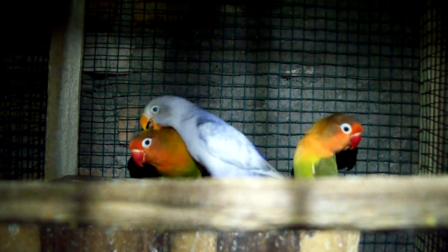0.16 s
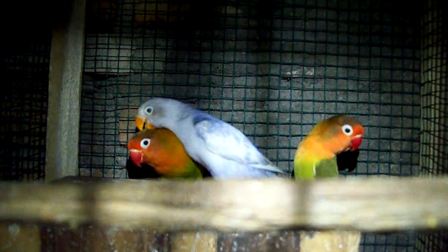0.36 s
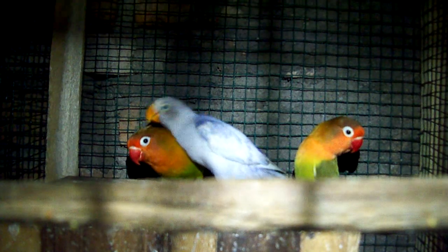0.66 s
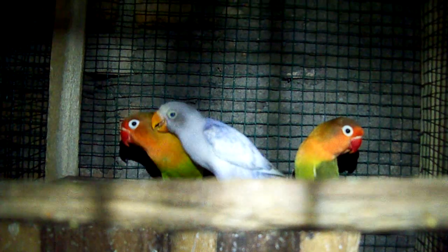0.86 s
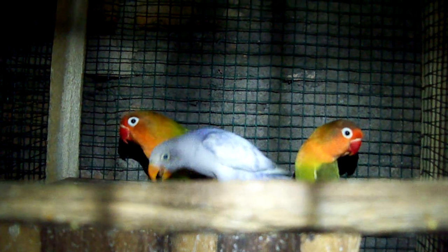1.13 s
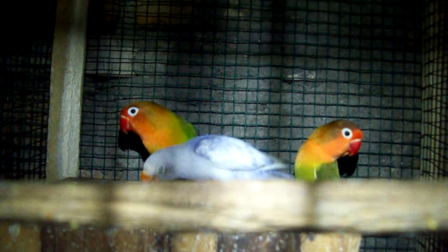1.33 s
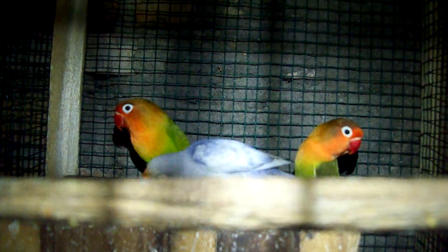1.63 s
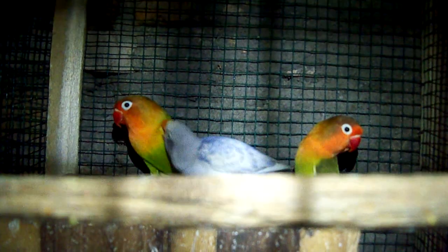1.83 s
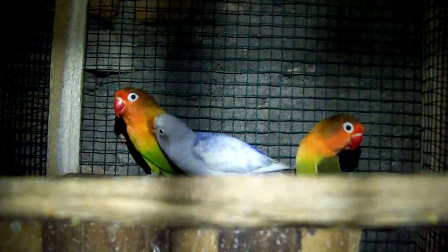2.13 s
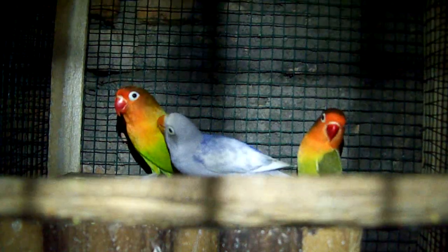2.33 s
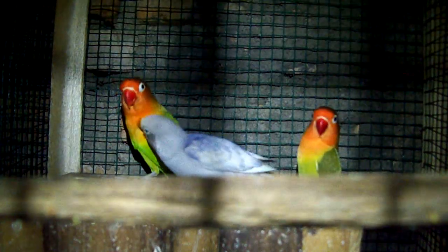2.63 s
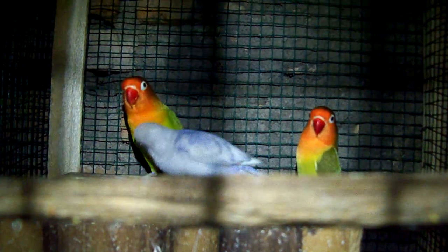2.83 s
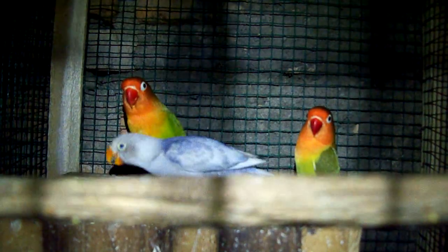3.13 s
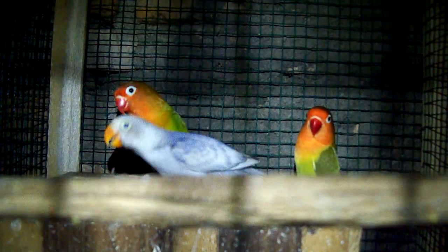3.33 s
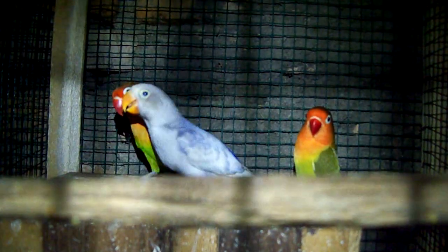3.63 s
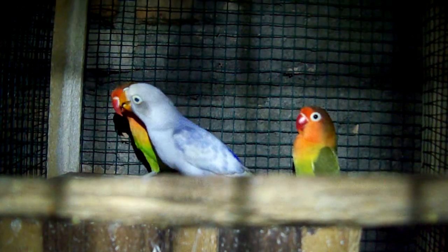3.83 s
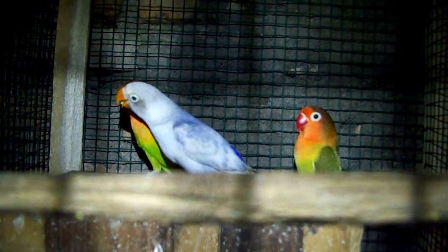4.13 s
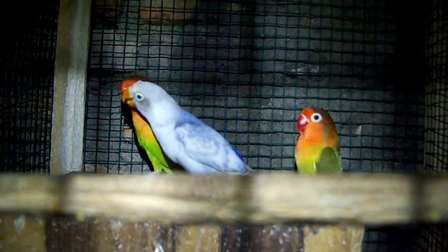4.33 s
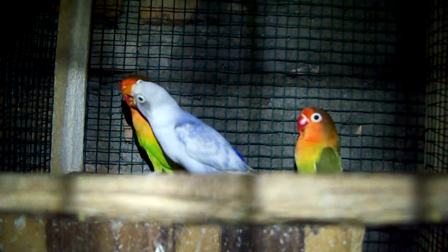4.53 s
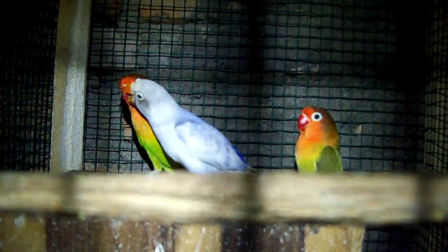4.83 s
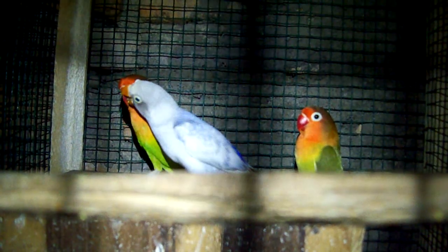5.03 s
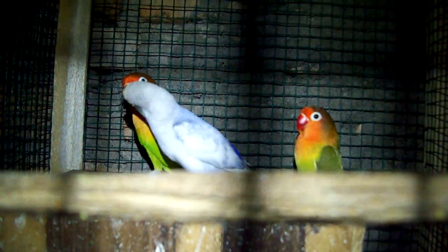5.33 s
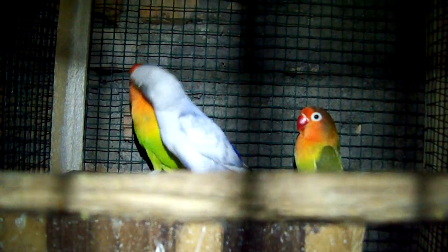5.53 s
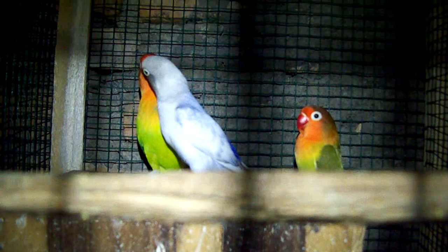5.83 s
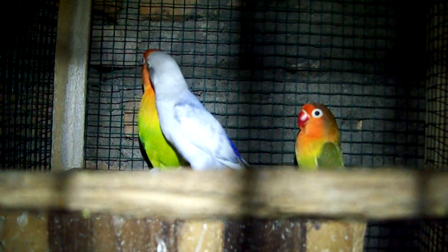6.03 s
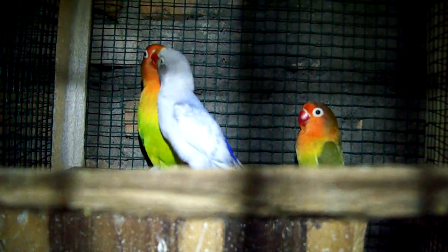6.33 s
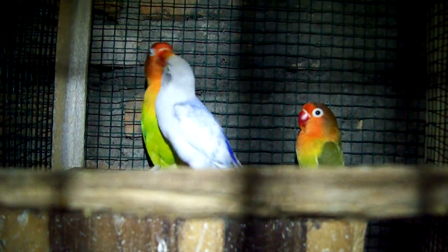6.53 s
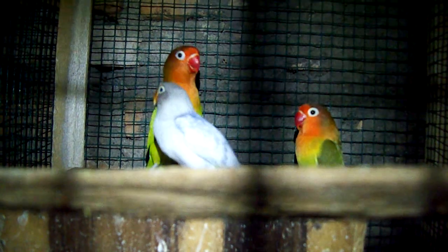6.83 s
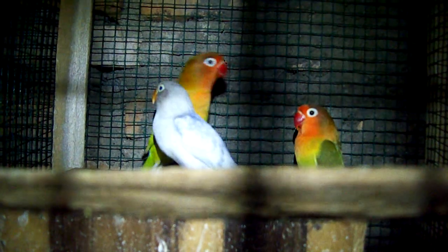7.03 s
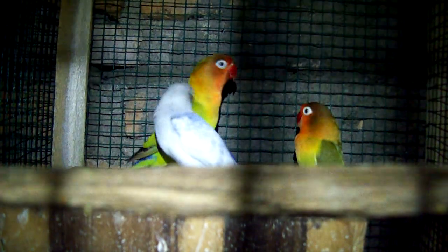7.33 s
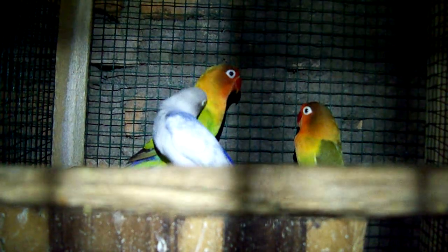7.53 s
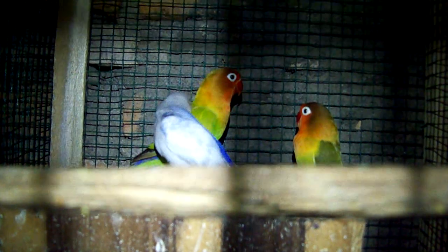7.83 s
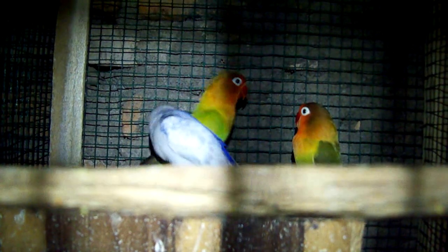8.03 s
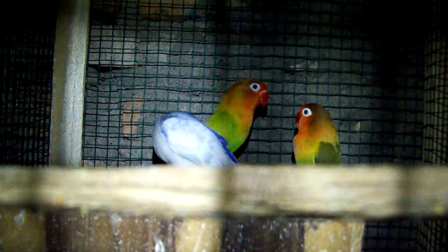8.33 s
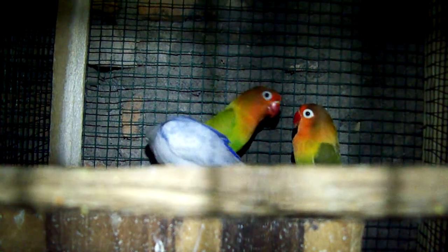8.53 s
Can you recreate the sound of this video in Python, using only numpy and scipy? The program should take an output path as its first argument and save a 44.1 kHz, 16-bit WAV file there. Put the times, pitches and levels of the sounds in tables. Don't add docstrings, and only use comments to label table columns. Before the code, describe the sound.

Small parrots in a wire cage, picked up by a small lo-fi camera microphone with dull, limited treble and short reflections from wires and walls. A low, uneven hum of air and distant traffic with faint hiss runs throughout. From 0 to 0.7 s, very short chirps, squeaks and scratchy falling notes around 2 to 3.5 kHz come in clusters, with soft feather puffs. A quick brighter group sounds at about 1 to 1.5 s. Then mostly hum, with faint peeps near 2.9 and 3.1 s and a light rustle. At 4 s, tiny dry knocks on the wooden perch lead into a loud, piercing flurry until 4.3 s; the background ducks abruptly. Weaker chirps and rasps trail to 4.8 s. The hum returns around 5.3 s. Sparse notes follow at 5.7 s, a small cluster at 6.3 to 6.7 s, then barely audible peeps and feather rustles to 8.5 s.

```python
import sys
import numpy as np
from scipy import signal
from scipy.fft import rfft, irfft, next_fast_len
from scipy.io import wavfile
from scipy.ndimage import uniform_filter1d

SR = 44100
rng = np.random.default_rng(int(sys.argv[2]) if len(sys.argv) > 2 else 0)


def file_out(sig):
    cols = np.atleast_2d(sig).T
    lim = np.clip(cols, -1, 1)
    pcm = np.round(lim * 32767).astype(np.int16)
    wavfile.write(sys.argv[1], SR, pcm)


def level_to_linear(level):
    exponent = np.asarray(level, float) / 20
    return 10 ** exponent


N = 382347
FOLD_HZ = 8000


def colour(x, shape):
    size = next_fast_len(len(x))
    hz, db = np.transpose(shape)
    bin_hz = np.arange(size // 2 + 1) * SR / size
    gain = level_to_linear(np.interp(np.log(bin_hz + 1), np.log(hz), db))
    return irfft(rfft(x, size) * gain, size)[:len(x)]


def unit(x):
    return x / np.sqrt(np.mean(x ** 2))


def walk(rate_hz):
    width = max(int(SR / rate_hz), 1)
    smooth = uniform_filter1d(rng.standard_normal(N), width)
    return unit(uniform_filter1d(smooth, width))


def birds():
    # f/Hz, level/dB per Hz
    breath_shape = [(1500, -31), (2500, -4.5), (4500, 5), (6500, -4), (8000, -8)]
    waver_share, waver_s = 0.008, 0.006
    out, wobble = np.zeros(N), walk(600)
    width = int(waver_s * SR)
    waver = unit(uniform_filter1d(uniform_filter1d(wobble, width), width))
    grains = [(walk(680) + 1j * walk(710)) / np.sqrt(2) for _ in range(4)]
    breath = unit(colour(rng.standard_normal(N), breath_shape)) * level_to_linear(4.7 * walk(250))
    for s, hz, db, rasp, (*partials_db, breath_db) in notes():
        first, last = max(int((s[0] - 0.001) * SR), 0), int((s[-1] + 0.0025) * SR)
        i = np.arange(first, last)
        shake = 0.06 * rasp ** 2 * wobble[i] + waver_share * waver[i]
        pitch = np.interp(i / SR, s, hz) * (1 + shake)
        phase = 2 * np.pi * np.cumsum(pitch) / SR
        edge = np.clip(np.minimum(i - i[0], i[-1] - i) / (0.003 * SR), 0, 1)
        loud = level_to_linear(np.interp(i / SR, s, db)) * edge
        out[i] += loud * level_to_linear(breath_db) * breath[i]
        levels_db = [*partials_db, partials_db[-1] - 5.5]
        for k, part_db in enumerate(levels_db, start=1):
            share = np.clip(1.54 * rasp * k, 0, 1)
            envelope = np.sqrt(1 - share ** 2) + share * grains[k - 1][i]
            tone = (envelope * np.exp(1j * k * phase)).imag
            audible = k * pitch < FOLD_HZ
            out[i] += np.sqrt(2) * loud * level_to_linear(part_db) * tone * audible
    return out


def notes():
    # partial 1 level/dB, partial 2 level/dB, partial 3 level/dB, breath level/dB
    pure = (0, -25, -19.5, -30)
    whistle = (0, -14.5, -34, -28)
    reed = (-1, -3.5, -34, -20)
    squeak = (-12.5, -1.5, -40, -14)
    pipe = (-31, -2, -30, -16.5)
    hollow = (-1, -23, -2.5, -17.5)
    full = (0, -4, -5.5, -23)
    scrape = (-10, 0.5, -29, -9.5)
    shriek = (-36, -2, -40, -24)
    croak = (-1.5, -14.5, -18, -21)
    rasping = (-11.5, -0.5, -5, -4)
    # peak place/0-1, start under peak/dB, end under peak/dB, pitch lift at the peak/share
    even, swell = (0.37, 2.5, 2.1, 0.003), (0.9, 7, 1.5, 0.003)
    fade, arch = (0.27, 1.5, 10.8, 0.005), (0.25, 2.5, 8, 0.04)
    flat = (0.5, 1.0, 0.3, 0.002)
    # t/s, length/s, first pitch f/Hz, last pitch f/Hz, level/dB
    pures = [
        (1.068, 0.0095, 2000, 1803, -22.5),
        (1.082, 0.011, 1715, 1950, -25.5),
        (1.087, 0.0055, 1990, 2660, -33),
    ]
    whistles = [(0.002, 0.0091, 2220, 2200, -31.5), (0.016, 0.016, 2230, 2200, -44),
                (0.336, 0.02, 3540, 3430, -38.5), (0.374, 0.019, 3610, 3590, -37.5),
                (0.94, 0.027, 3190, 2880, -43.5), (2.848, 0.024, 2960, 2380, -43),
                (4.143, 0.011, 3760, 3835, -21.5), (4.268, 0.015, 3890, 3680, -19.5),
                (4.656, 0.02, 3680, 3700, -51), (4.596, 0.027, 2140, 2040, -44),
                (5.711, 0.016, 2840, 2750, -40), (4.282, 0.011, 3070, 3310, -28),
                (7.11, 0.018, 3750, 3800, -50)]
    whistle_swells = [
        (1.063, 0.006, 3250, 1980, -32),
        (3.1, 0.026, 2950, 2900, -39.5),
        (4.244, 0.022, 3330, 3500, -27),
        (0.378, 0.042, 2510, 2370, -30.5),
    ]
    whistle_fades = [
        (4.128, 0.015, 4100, 3700, -20.5),
        (4.293, 0.012, 3800, 3990, -26.5),
        (4.457, 0.045, 2880, 2940, -38),
        (4.299, 0.04, 3120, 3240, -49),
    ]
    reeds = [
        (1.01, 0.019, 2700, 3120, -39),
        (1.021, 0.026, 3080, 3320, -33.5),
        (1.044, 0.005, 3410, 3640, -34.5),
        (1.091, 0.02, 3214, 3270, -32.5),
        (4.402, 0.0091, 2500, 2650, -42),
        (4.41, 0.03, 2680, 2920, -40),
    ]
    rough_reeds = [(0.108, 0.02, 3050, 3000, -45), (0.137, 0.02, 3160, 3480, -38),
                   (0.165, 0.043, 2620, 2590, -39.5), (0.357, 0.013, 2780, 2760, -38),
                   (0.49, 0.04, 3050, 2900, -41.5), (1.378, 0.02, 3370, 3110, -42),
                   (1.46, 0.018, 3160, 3340, -48), (4.115, 0.013, 3530, 3740, -21.5),
                   (4.333, 0.017, 3900, 3930, -44.5), (4.703, 0.019, 2490, 2470, -43.5),
                   (4.722, 0.028, 2530, 2740, -44), (4.751, 0.025, 2700, 2620, -51),
                   (5.69, 0.02, 3130, 3050, -51), (6.273, 0.024, 3060, 2910, -36.5),
                   (6.602, 0.029, 3050, 4030, -45.5), (7.742, 0.02, 3600, 3500, -47)]
    reed_fades = [
        (4.448, 0.025, 3350, 3960, -35.5),
        (6.269, 0.012, 2950, 2900, -42),
    ]
    squeaks = [(4.283, 0.013, 3080, 3280, -24.5), (6.287, 0.018, 2860, 2620, -41),
               (0.316, 0.011, 2770, 2800, -37), (1.398, 0.022, 3580, 3770, -50.5),
               (3.885, 0.008, 2920, 2900, -48), (4.63, 0.027, 3130, 2940, -52),
               (6.547, 0.008, 3180, 3330, -43), (6.687, 0.0087, 3550, 3570, -41.5)]
    squeak_arches = [
        (0.06, 0.016, 2820, 2870, -25.5),
        (0.615, 0.019, 3120, 3110, -27.5),
    ]
    squeak_fades = [
        (6.294, 0.04, 2930, 2980, -36),
        (0.083, 0.099, 2890, 2800, -37.5),
        (1.196, 0.024, 3400, 3350, -49),
        (6.587, 0.012, 3080, 2860, -37),
    ]
    pipes = [
        (0.008, 0.047, 2355, 2380, -28),
        (4.608, 0.019, 3060, 3000, -44),
        (6.639, 0.012, 3190, 3170, -30),
        (-0.003, 0.046, 2620, 2710, -33),
        (4.574, 0.015, 2430, 2800, -35.5),
        (6.656, 0.026, 2790, 2220, -43),
    ]
    pipe_fades = [
        (0.243, 0.07, 2300, 2440, -37),
        (4.487, 0.012, 2300, 2330, -40),
        (1.049, 0.013, 2550, 2390, -34.5),
        (4.17, 0.02, 2600, 2400, -17),
        (4.2, 0.022, 3050, 3090, -50),
    ]
    hollows = [
        (0.512, 0.025, 2520, 2460, -50),
        (0.632, 0.043, 2170, 2106, -36),
        (0.869, 0.023, 2630, 2210, -44),
        (0.886, 0.026, 1920, 1910, -50),
        (3.892, 0.0096, 2100, 2100, -43),
        (4.544, 0.029, 2090, 2180, -45),
    ]
    fulls = [
        (4.079, 0.022, 2314, 2288, -20),
    ]
    scrapes = [
        (0.045, 0.013, 2596, 2940, -29.5),
        (0.243, 0.02, 3250, 3150, -37.5),
        (0.428, 0.018, 2680, 2520, -34),
        (0.42, 0.06, 2400, 2390, -31.5),
        (5.723, 0.03, 2720, 2800, -51),
        (6.9, 0.019, 3500, 3580, -51.5),
    ]
    shrieks = [
        (4.157, 0.005, 3090, 3270, -16),
        (4.164, 0.01, 3320, 3065, -14),
    ]
    croaks = [
        (1.23, 0.022, 2390, 2130, -42),
        (1.25, 0.024, 2160, 2260, -41),
        (4.181, 0.013, 2600, 1970, -32.5),
        (4.414, 0.035, 2000, 2400, -39.5),
        (0.385, 0.035, 2560, 2370, -34),
        (4.675, 0.027, 3330, 2840, -43),
    ]
    croak_fades = [
        (0.464, 0.062, 2355, 2240, -36),
        (0.631, 0.045, 2570, 2170, -39),
        (1.298, 0.065, 2447, 2290, -38),
        (4.295, 0.021, 3350, 2280, -40),
    ]
    rasps = [
        (4.102, 0.013, 2970, 2470, -19.5),
        (4.178, 0.0097, 2530, 2360, -34),
        (4.421, 0.027, 2310, 2600, -40),
        (4.5, 0.014, 2710, 2800, -43.5),
    ]
    singers = [
        (pure, even, 0.12, pures),
        (whistle, even, 0.14, whistles),
        (whistle, swell, 0.1, whistle_swells),
        (whistle, fade, 0.12, whistle_fades),
        (reed, even, 0.13, reeds),
        (reed, even, 0.33, rough_reeds),
        (reed, fade, 0.2, reed_fades),
        (squeak, even, 0.22, squeaks),
        (squeak, arch, 0.25, squeak_arches),
        (squeak, fade, 0.28, squeak_fades),
        (pipe, even, 0.22, pipes),
        (pipe, fade, 0.2, pipe_fades),
        (hollow, even, 0.16, hollows),
        (full, flat, 0.09, fulls),
        (scrape, even, 0.42, scrapes),
        (shriek, even, 0.32, shrieks),
        (croak, even, 0.38, croaks),
        (croak, fade, 0.4, croak_fades),
        (rasping, even, 1, rasps)]
    for voice, (peak, rise_db, fall_db, lift), rasp, table in singers:
        for s, length, first_hz, last_hz, db in table:
            top_hz = (first_hz + peak * (last_hz - first_hz)) * (1 + lift)
            times = [s, s + peak * length, s + length]
            yield times, [first_hz, top_hz, last_hz], [db - rise_db, db, db - fall_db], rasp, voice


def cage_and_room(voices):
    age = np.arange(SR // 2) / SR
    fade = 0
    for t60_s, db in [(0.065, -6.5), (0.26, -21)]:
        fade = fade + level_to_linear(db) * 1000.0 ** (-age / t60_s) / np.sqrt(t60_s * SR / 14)
    diffuse = unit(colour(rng.standard_normal(len(age)), [(2000, -1.0), (6000, 1.0)]))
    echo = diffuse * fade * (age > 0.003)
    return signal.fftconvolve(voices, echo)[:N]


def perch_steps():
    # t/s, peak level/dB, ring f/Hz
    steps = [
        (3.985, -17, 334),
        (3.996, -22, 1200),
        (4.012, -21.5, 331),
    ]
    out, t = np.zeros(N), np.arange(N) / SR
    for s, db, hz in steps:
        age = np.maximum(t - s, 0)
        out += level_to_linear(db) * np.sin(2 * np.pi * hz * age) * np.exp(-age / 0.00092)
    return out


def feathers():
    # t/s, length/s, level/dB
    rustles = [(0.153, 0.089, -39.5), (0.19, 0.051, -43), (0.251, 0.02, -45), (0.4, 0.11, -47),
               (0.5, 0.06, -47), (6.4, 0.04, -49), (3.186, 0.071, -47.5), (3.995, 0.035, -54),
               (4.744, 0.15, -54.5), (7.515, 0.091, -49), (7.72, .1, -55), (7.971, 0.033, -50.5),
               (8.121, 0.039, -46.5)]
    out, t = np.zeros(N), np.arange(N) / SR
    friction = colour(rng.standard_normal(N), [(2000, -24), (4500, -8.0), (6500, 0.5), (8000, -9.5)])
    friction = unit(friction) * level_to_linear(4.3 * walk(150))
    for s, length, db in rustles:
        out += level_to_linear(db) * friction * np.exp(-(2 * (t - s) / length) ** 2)
    return out


def air():
    # t/s, length/s, level/dB
    traffic = [(2.065, 0.4, 3), (2.311, 0.14, 4.5), (3.313, 0.19, 3.5), (3.76, .3, -2.5),
               (4.756, 0.096, 2.5), (6.438, 0.37, 2), (7.463, 0.35, 2.5), (8.274, 0.15, 5), (8.574, 0.3, 3),
               (2.504, .15, 2.5)]
    # f/Hz, level/dB per Hz
    hum_shape = [(15, 10.5), (30, -3), (110, 2), (185, -8.5), (300, -5), (600, -7), (780, -3), (1300, -6.5),
                 (2000, -10), (2700, -15.5), (3600, -22.5), (5000, -77.5)]
    hiss_shape = [(2500, -1.5), (4000, 3), (5000, 1), (6000, 4), (7000, 6), (7600, 0), (8000, -8)]
    # t/s, level/dB
    ducking = [
        (0, 0),
        (4.09, -0.5),
        (4.13, -9.5),
        (4.19, -9.5),
        (5.2, -10.5),
        (5.3, -3),
        (6.2, -1.5),
        (6.6, -1),
    ]
    hum_db, hiss_db = -36.5, -49.5
    t, hum = np.arange(N) / SR, 0
    traffic_db = sum(db * np.exp(-(2 * (t - s) / length) ** 2) for s, length, db in traffic)
    for hz in 20 * 2 ** np.arange(8):
        octave = [(hz / 2, -60), (hz / 1.6, -6), (hz, 0), (hz * 1.6, -6), (hz * 2, -60)]
        band = colour(rng.standard_normal(N), octave)
        tyre_share = np.exp(-np.log(hz / 900) ** 2)
        hum = hum + band * level_to_linear(1.7 * walk(5.16) + traffic_db * tyre_share)
    hiss = colour(rng.standard_normal(N), hiss_shape) * level_to_linear(1.0 * walk(8.8) + 1.27 * walk(30))
    both = unit(colour(hum, hum_shape)) * level_to_linear(hum_db) + unit(hiss) * level_to_linear(hiss_db)
    return both * level_to_linear(np.interp(t, *np.transpose(ducking)))


def scene():
    voices = birds()
    mix = voices + cage_and_room(voices) + perch_steps() + feathers() + air()
    return mix[None]


def band_limit(x):
    return signal.sosfilt(signal.butter(12, 10370, fs=SR, output="sos"), x)


def record(dry):
    # f/Hz, gain/dB
    port_shape = [(3000, 0), (3600, -3), (4000, -12.5), (4220, -23.5), (4450, -10), (4900, -3.5), (5600, 0)]
    # f/Hz, gain/dB
    mirror_shape = [(7000, 0.5), (8000, 4.5), (8600, -6.5), (9200, -18.5), (9800, -29.5), (10300, -47),
                    (10900, -110)]
    x = colour(dry[0], port_shape)
    x = np.tanh(1.3 * x) / 1.3
    x = colour(x, [(FOLD_HZ - 30, 0), (FOLD_HZ, -6), (FOLD_HZ + 30, -90)])
    carrier = np.cos(4 * np.pi * FOLD_HZ * np.arange(N) / SR)
    mirror = 2 * colour(x, [(4000, -90), (4500, 0)]) * carrier
    return band_limit(colour(x + mirror, mirror_shape)[None])


dry = scene()
out = record(dry)
file_out(out)
```